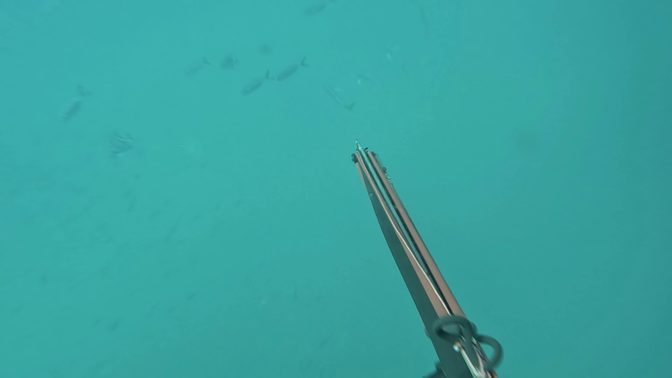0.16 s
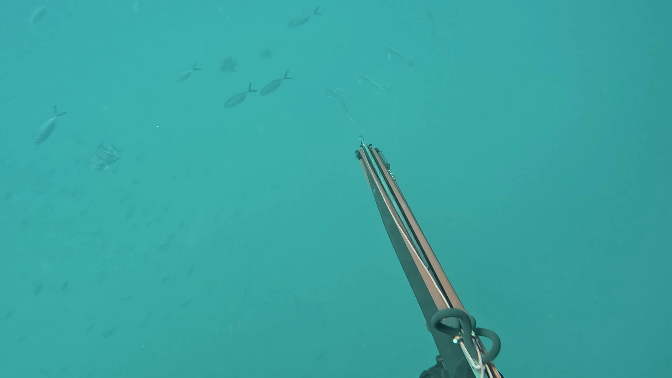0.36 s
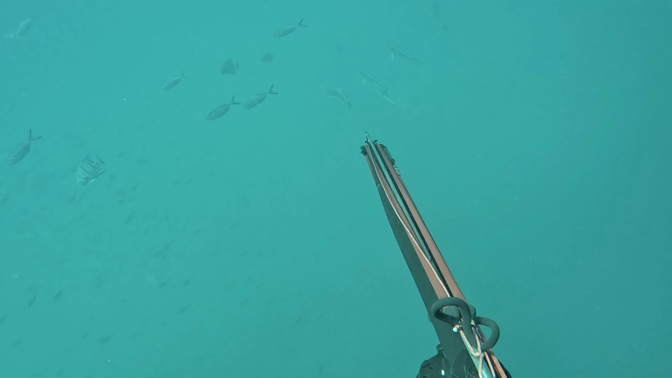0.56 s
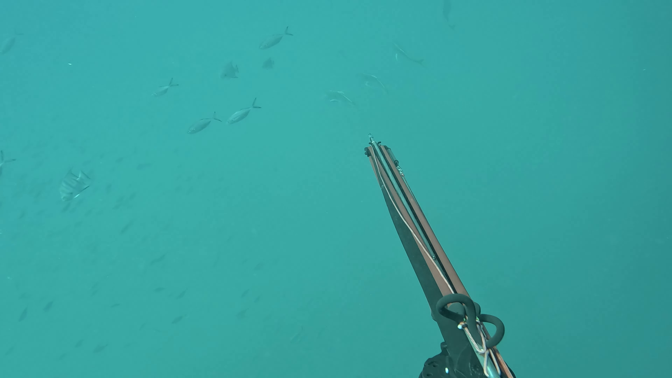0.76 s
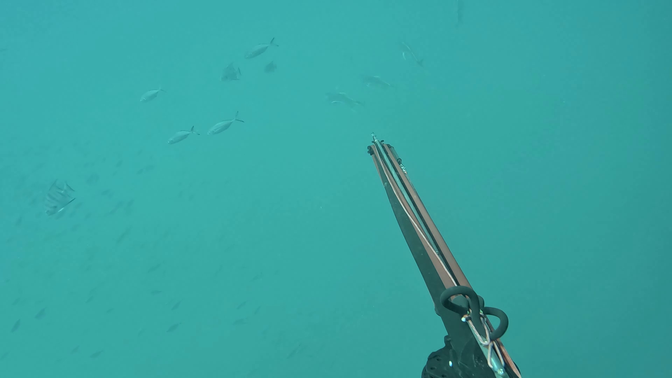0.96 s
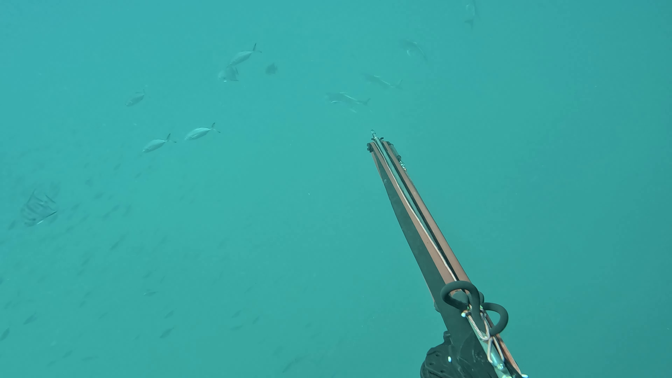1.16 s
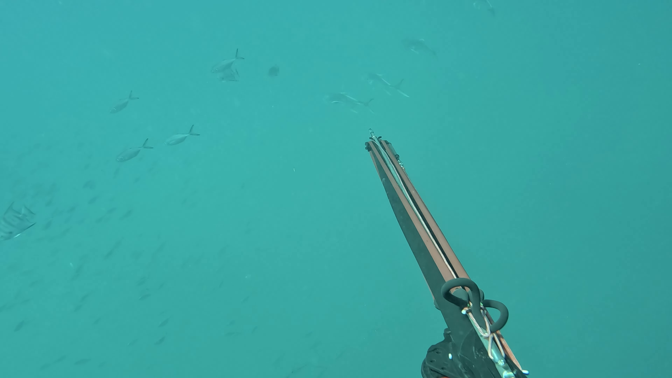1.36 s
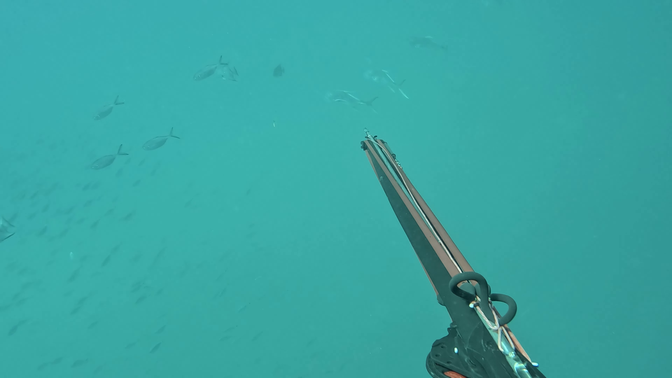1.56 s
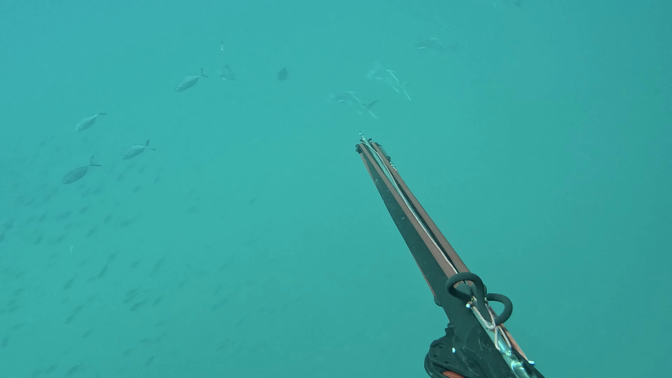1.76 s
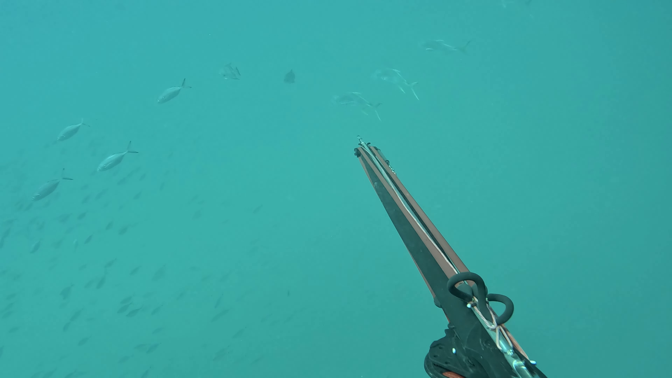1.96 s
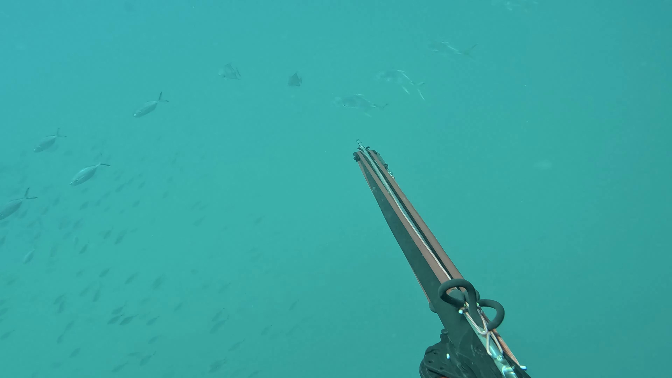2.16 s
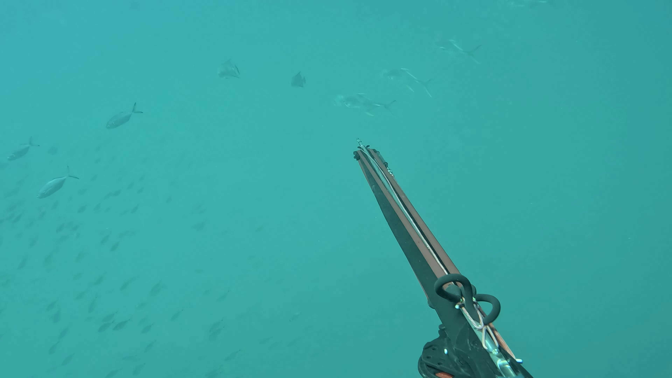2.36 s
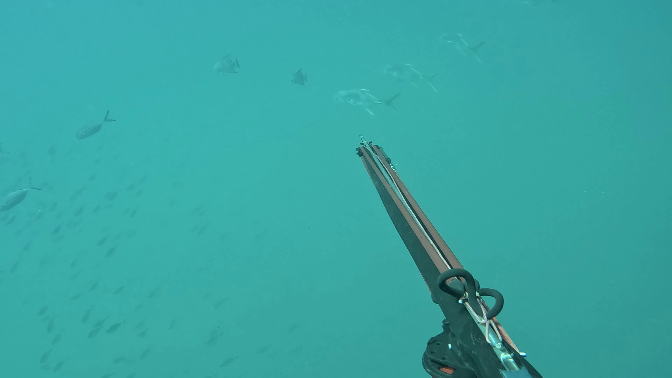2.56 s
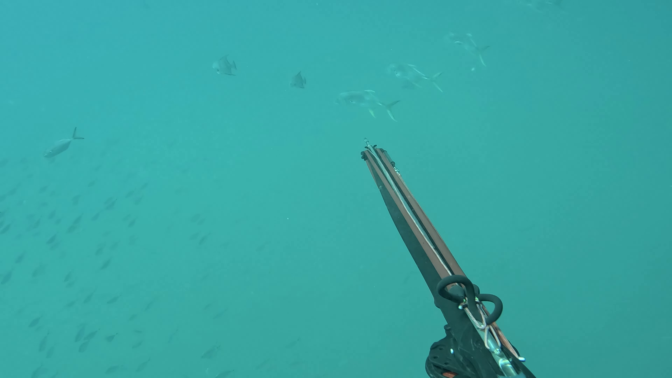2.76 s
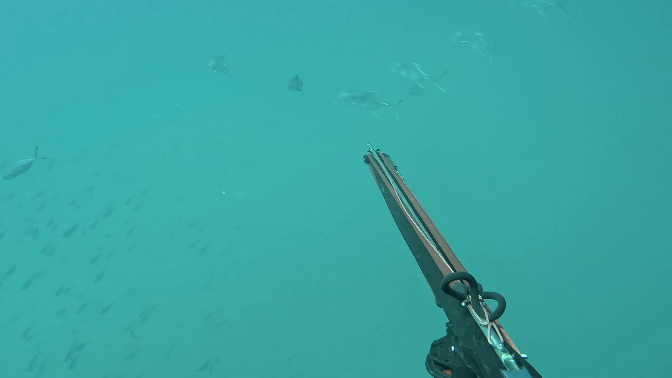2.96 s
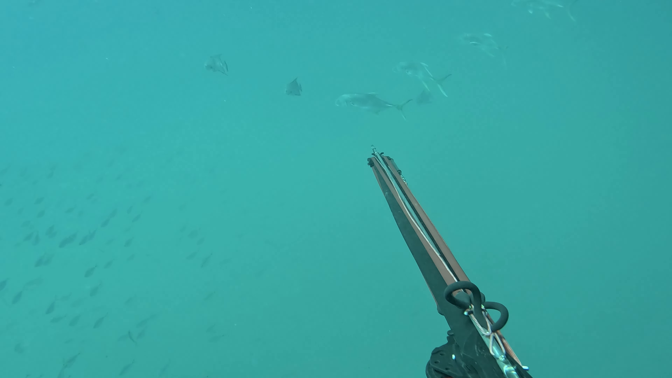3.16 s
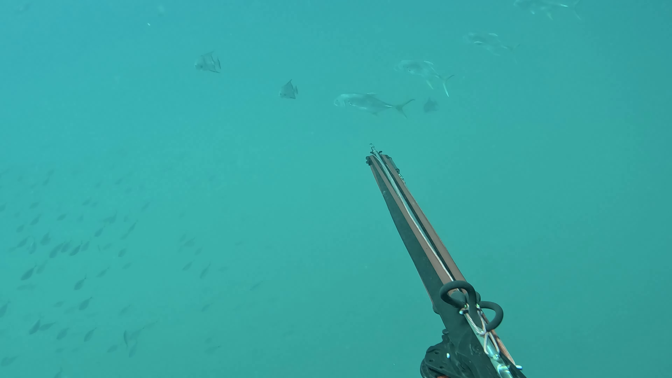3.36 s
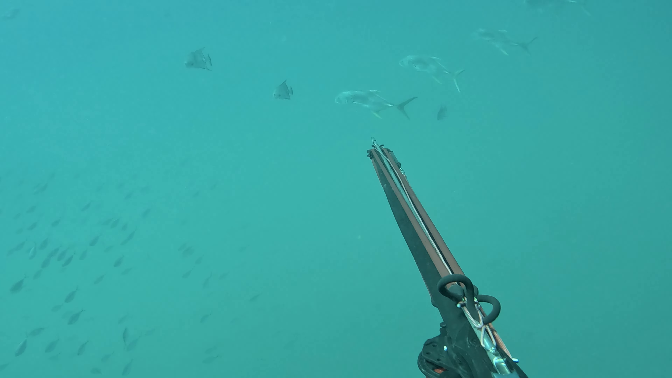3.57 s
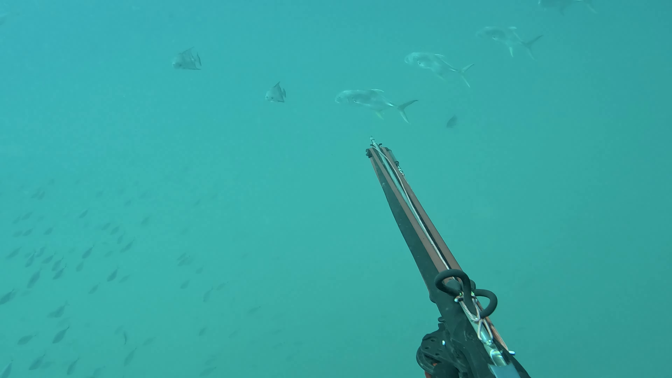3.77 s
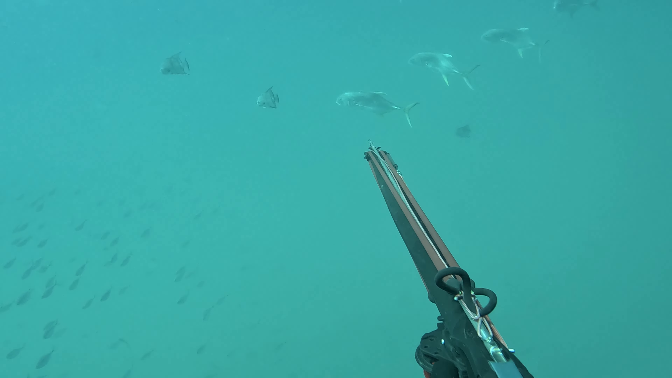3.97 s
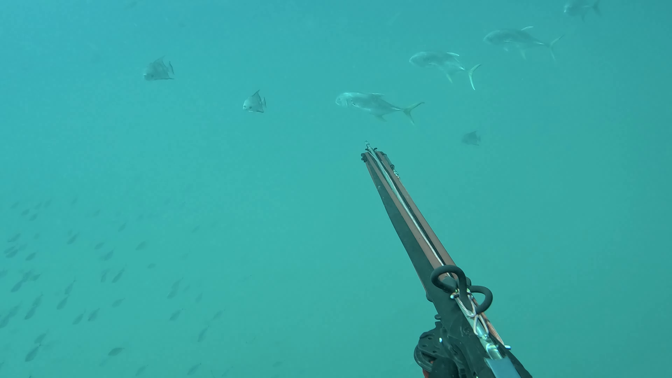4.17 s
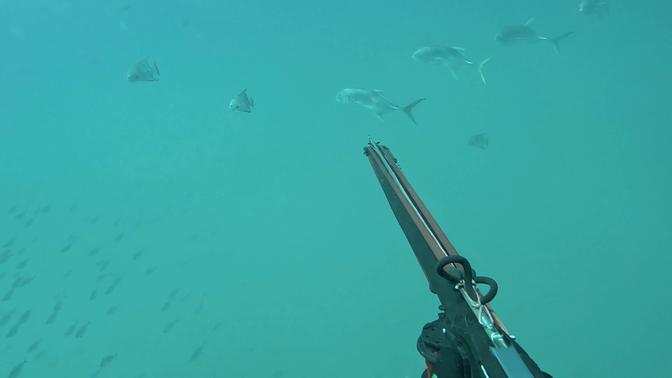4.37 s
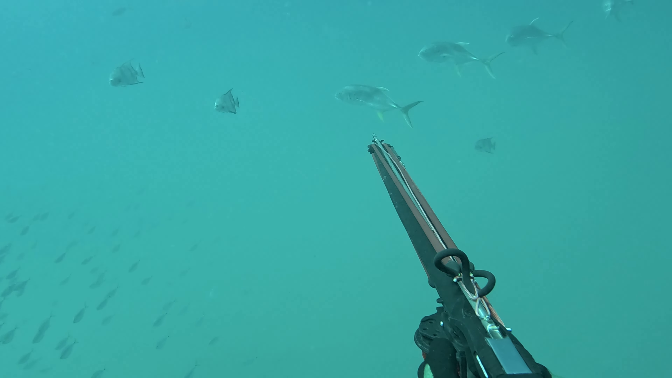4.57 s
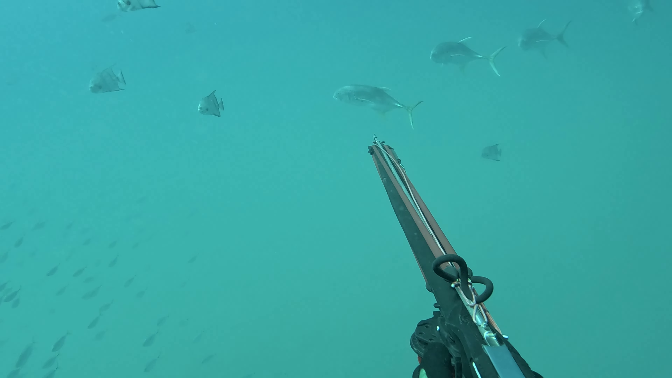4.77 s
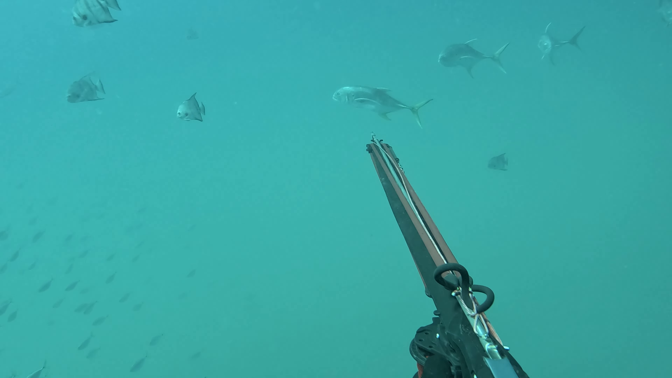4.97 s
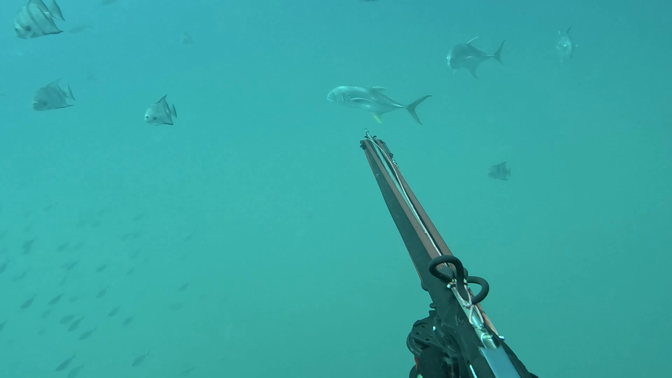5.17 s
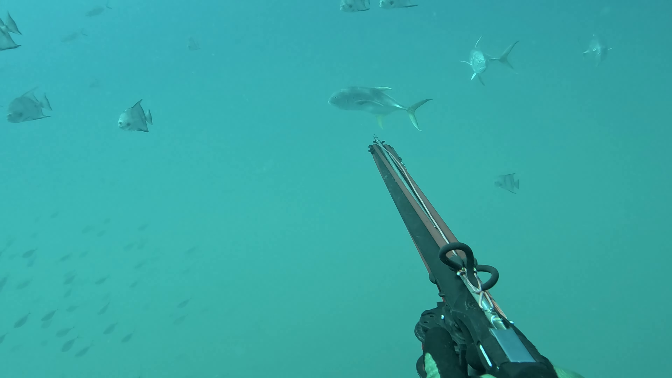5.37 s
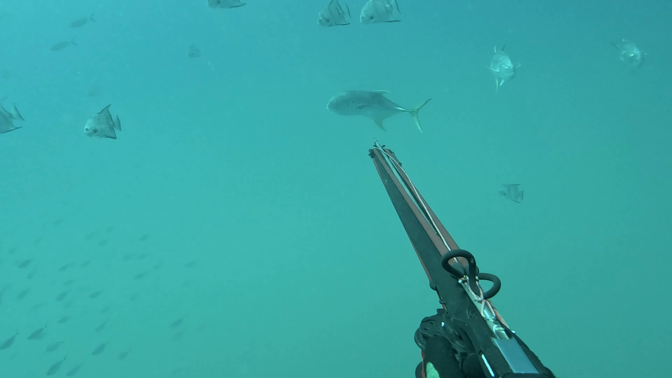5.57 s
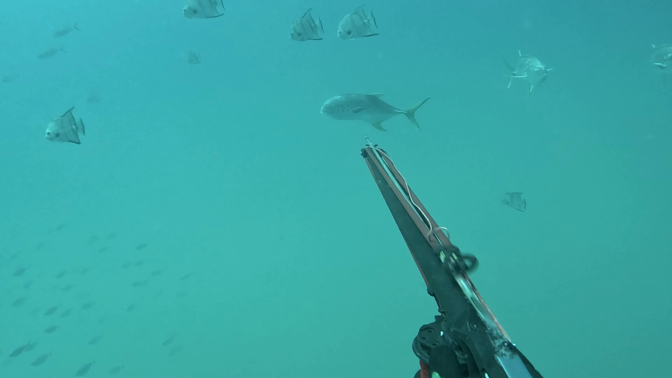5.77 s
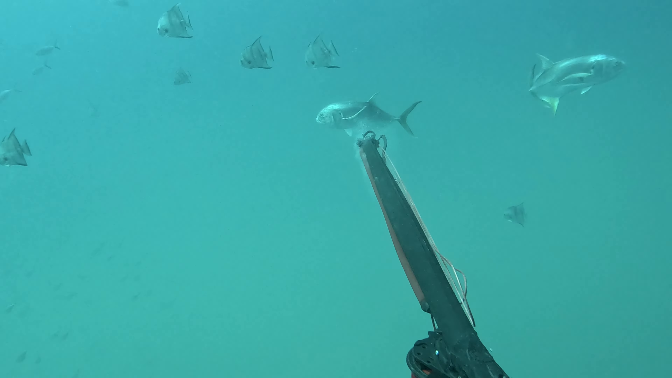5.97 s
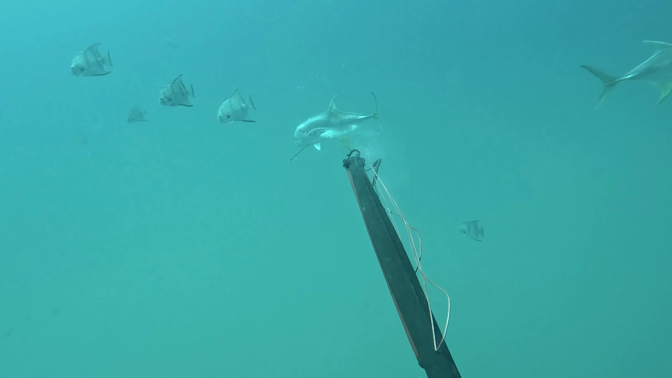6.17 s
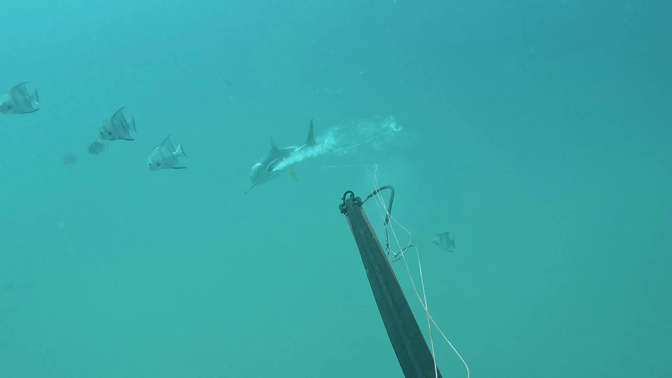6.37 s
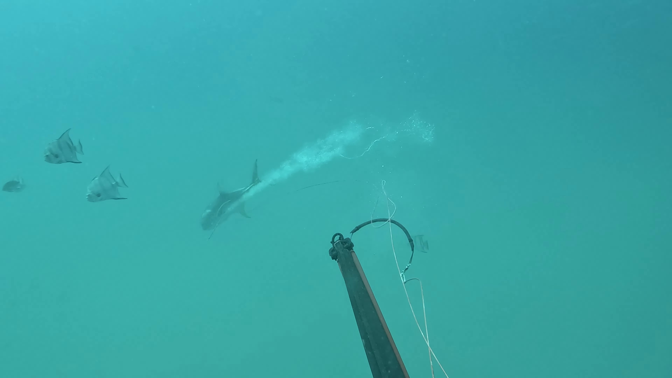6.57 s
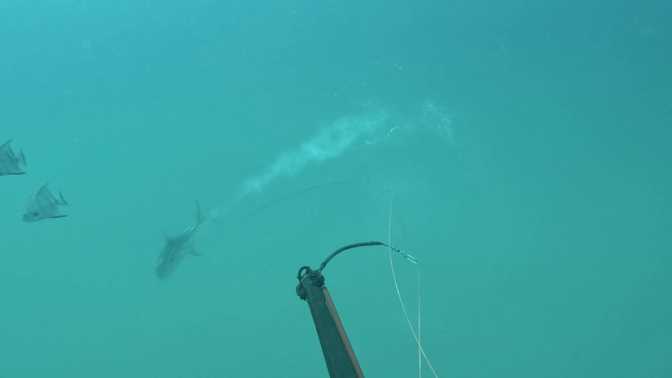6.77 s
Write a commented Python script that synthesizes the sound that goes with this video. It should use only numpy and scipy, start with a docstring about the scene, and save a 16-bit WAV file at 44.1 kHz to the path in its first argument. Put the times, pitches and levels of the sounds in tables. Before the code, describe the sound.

Heard from inside an underwater camera case: low rumble, a faint slow throb and constant snapping shrimp crackle, with small sloshes against the case. Near two seconds one snap lands extremely close, ringing the case and briefly ducking everything. Just before six seconds a dull bump precedes the speargun: trigger clack, rattling metallic scrape, hard double slap and deep thud. Stirred bubbly water then swishes past.

```python
"""Under water by a reef, heard from inside a camera housing: snapping shrimp crackle, made of short noise bursts,
while water rumbles, throbs and sloshes round the case, made of coloured noise, damped swings and bubble blips.
One snap lands very close, rings the case and ducks the recorder's gain. Late on a band speargun fires: the trigger
clacks, the shaft scrapes along its track and the bands slap the muzzle, all of them filtered noise.
Dull bumps go with it, and stirred water swishes after the recoil."""
import sys
import numpy as np
from scipy import signal
from scipy.fft import rfft, irfft, next_fast_len
from scipy.io import wavfile
from scipy.ndimage import uniform_filter1d, minimum_filter1d, map_coordinates

SR = 44100
rng = np.random.default_rng(int(sys.argv[2]) if len(sys.argv) > 2 else 0)


def to_wav(s):
    """Save 16-bit WAV."""
    ch = np.atleast_2d(s).T  # columns
    pcm = np.round(np.clip(ch, -1, 1) * 32767)  # PCM
    wavfile.write(sys.argv[1], SR, pcm.astype(np.int16))


N = 301203
T = np.arange(N) / SR  # time of every sample in seconds
HIT_T = T[:6144]  # time within one short sound

# Tone colour of a snap's woody body. Each row: frequency in Hz, relative level in dB per Hz.
BODY_SPECTRUM = [(500, -27.5), (900, -20.5), (1250, -6.5), (1550, 2), (1850, -2.5), (2100, -13),
                 (2500, -22.5), (4000, -49.5)]
# Tone colour of a snap's middle ring. Each row: frequency in Hz, relative level in dB per Hz.
RING_SPECTRUM = [(1500, -56.5), (2100, -7.5), (2400, -3.5), (2700, 1), (3000, -6), (3250, 0), (3550, -12),
                 (4200, -5.5), (6000, -44)]
# Tone colour of a snap's bright edge. Each row: frequency in Hz, relative level in dB per Hz.
BRIGHT_SPECTRUM = [(2500, -14), (3600, -20), (4250, 3.5), (4900, -3.5), (6000, -5.5), (7100, -8.5),
                   (7750, -2), (8600, -21), (10000, -19), (11000, -39.5), (12000, -24), (13000, -47),
                   (16000, -87)]
# Tone colour of a snap's sharpest edge. Each row: frequency in Hz, relative level in dB per Hz.
CRACK_SPECTRUM = [(2000, -7), (4500, -5), (7800, 0), (9000, -5), (12200, -14.5), (16000, -34)]
# Tone colour of the drone in the case's hollow. Each row: frequency in Hz, relative level in dB per Hz.
HOLLOW_SPECTRUM = [(50, -13.5), (100, -0.5), (125, -2.5), (155, 2.5), (180, -2.5), (215, 1.5), (250, -7),
                   (310, -20), (600, -45.5)]
# Tone colour of murky, muffled water noise. Each row: frequency in Hz, relative level in dB per Hz.
MURK_SPECTRUM = [(200, -16.5), (600, -3.5), (950, 3), (1200, 2), (1500, 2), (1800, -2), (2200, -36),
                 (3200, -20), (3600, -48), (6000, -62)]


def amp(db):
    """Turns decibels into a plain gain."""
    return 10 ** (np.asarray(db) / 20)


def unit(x):
    """Scales a sound to an average strength (rms) of 1."""
    return x / np.sqrt(np.mean(x ** 2) + 1e-20)


def along(points, hz):
    """Reads a (Hz, value) table at any frequency, on a log axis as pitch is heard."""
    point_hz, values = np.transpose(points)
    return np.interp(np.log(hz + 1), np.log(point_hz + 1), values)


def curve(rows):
    """Joins (seconds, value) rows by straight lines, one value per sample."""
    times, values = np.transpose(rows)
    return np.interp(T, times, values)


def wobble(rate):
    """A smooth random curve that takes a new random value this many times a second."""
    knots = rng.standard_normal(int(N * rate / SR) + 4)
    return map_coordinates(knots, [T * rate])


def envelope(start, hold, attack, release):
    """Rises over the attack, stays until the hold is over, then dies away; all in seconds."""
    rise = np.clip((T - start) / attack, 0, 1)
    return rise * np.exp(-np.maximum(T - start - hold, 0) / release)


def filtered(x, response):
    """Changes each frequency of x by the given response."""
    padded = next_fast_len(N + 8192)
    hz = np.fft.rfftfreq(padded, 1 / SR)
    return irfft(rfft(x, padded) * response(hz), padded)[..., :N]


def coloured(x, spectrum, size=8192):
    """Gives x this spectrum with a filter that only looks back in time, falling away above the last point."""
    hz = np.fft.rfftfreq(size, 1 / SR)
    gain = amp(along(spectrum, hz)) / np.maximum(hz / spectrum[-1][0], 1) ** 4
    # folding the log spectrum makes the filter act as early as it can
    cepstrum = irfft(np.log(gain + 1e-6))
    fold = np.r_[1, np.full(size // 2 - 1, 2), np.zeros(size // 2)]
    impulse = irfft(np.exp(rfft(cepstrum * fold)))
    return signal.fftconvolve(x, impulse)[:len(x)]


def noise(spectrum):
    """Steady noise of rms 1 with this tone colour."""
    return unit(coloured(rng.standard_normal(N), spectrum))


def add(track, s, sound):
    """Mixes a sound into the track at time s."""
    part = track[round(s * SR):][:len(sound)]
    part += sound[:len(part)]


def burst(spectrum, t60, attack=0.00037, direct=0):
    """A short crack: a direct pulse and scatter that drops 60 dB in t60 seconds; rms 1 over its first 6 ms."""
    fade = amp(-60 * HIT_T / t60) * (1 - np.exp(-HIT_T / attack))
    push = rng.standard_normal(len(HIT_T)) * fade
    push[round(attack * SR)] += direct * np.linalg.norm(push) * rng.choice([-1, 1])
    crack = coloured(push, spectrum, size=2048)
    return crack / np.sqrt(np.mean(crack[:SR * 6 // 1000] ** 2))


def swell(hz, rise):
    """A heavily damped swing whose envelope peaks after its rise time in seconds."""
    u = HIT_T / rise
    return u ** 2 * np.exp(2 * (1 - u)) * np.sin(2 * np.pi * hz * HIT_T)


def scattered(x, wet_db, t60):
    """Adds the faint diffuse return from sea bed and surface."""
    fade = amp(-60 * HIT_T / t60) * (1 - np.exp(-HIT_T / 0.007))
    tail = rng.standard_normal(len(HIT_T)) * fade
    return x + amp(wet_db) * signal.fftconvolve(x, tail / np.linalg.norm(tail))[:N]


def crackle(spectrum, snaps, spread_db, t60):
    """Crackle of rms 1; each row gives moment, nearness and path spread, 0-1; longer paths smear a snap."""
    power = np.zeros(N)
    for when, nearness, path in snaps:
        life = t60 * amp(16.2 * path)
        shape = amp(-60 * HIT_T / life) * (1 - np.exp(-HIT_T * 25 / life))
        level = amp(spread_db * nearness ** 3 - 22.3 * path)
        add(power, when * (N - 1) / SR, (level * shape) ** 2)
    return unit(coloured(np.sqrt(power) * rng.standard_normal(N), spectrum))


def bubbles(low_hz, high_hz, cycles, count):
    """A dense gurgle of rms 1: short damped blips of scattered pitch and size."""
    out = np.zeros(N)
    for when, pitch, size in rng.random((count, 3)):
        hz = low_hz * (high_hz / low_hz) ** pitch
        add(out, when * (N - 1) / SR, amp(22.0 * size ** 2) * swell(hz, cycles / hz))
    return unit(out)


def shrimp():
    """Each near claw snap rings the case: a woody body, a ring above it and a bright edge with its own pitch."""
    # The nearest snaps. Each row: start in seconds, body level in dB, edge level in dB, edge pitch in Hz.
    near_snaps = [(0.3215, -57, -41, 5400), (0.3694, -34.5, -49, 5300), (0.44, -52, -41, 5300),
                  (0.5038, -37.5, -51, 6100), (0.5346, -55, -42, 5300), (0.554, -61, -40.5, 6400),
                  (0.5797, -38.5, -46, 5500), (0.621, -36, -34, 5170), (0.7647, -49.5, -41.5, 4400),
                  (0.8518, -42, -56, 5400), (0.8936, -57, -41.5, 5270), (0.9595, -69, -42.5, 6050),
                  (1.0913, -41.5, -46, 5300), (1.111, -47, -29.5, 4280), (1.31, -39, -47, 5400),
                  (1.3248, -24, -30.5, 7140), (1.363, -32.5, -62, 7400), (1.5612, -43, -44, 4300),
                  (1.762, -42, -36, 4120), (1.8941, -40, -31, 4170), (1.906, -31, -40, 7500),
                  (2.1863, -34.5, -51, 4000), (2.2446, -36.5, -40.5, 4060), (2.413, -42, -38.5, 4300),
                  (2.4669, -39.5, -46, 3900), (2.5372, -47, -40.5, 4530), (2.6193, -35, -43.5, 4140),
                  (2.641, -40, -45.5, 4300), (2.8759, -35.5, -38, 4300), (3.0174, -42, -41, 7760),
                  (3.0748, -48, -35.5, 4200), (3.208, -32.5, -43.5, 5360), (3.3028, -29.5, -38, 5900),
                  (3.3445, -37.5, -42, 7600), (3.411, -39, -38.5, 7440), (3.4415, -55, -42.5, 6200),
                  (3.5234, -36, -43, 7700), (3.612, -32, -38, 6500), (3.693, -38.5, -45, 6000),
                  (3.7105, -35, -41, 5900), (3.7332, -58, -40.5, 7440), (3.7779, -34.5, -66, 5400),
                  (3.901, -36.5, -42, 7800), (4.11, -38.5, -41, 4500), (4.3238, -27.5, -39.5, 6200),
                  (4.3595, -32.5, -35, 4400), (4.395, -44, -37.5, 4500), (4.4042, -43, -42, 4300),
                  (4.5286, -31.5, -43.5, 6400), (4.811, -30.5, -47, 4600), (4.866, -39.5, -50, 4700),
                  (4.9584, -46, -35.5, 7660), (5.154, -38, -34, 4400), (5.2, -42, -41.5, 4560),
                  (5.2237, -39, -32.5, 4300), (5.3366, -31.5, -42, 5860), (5.4557, -31.5, -40.5, 4530),
                  (5.6371, -35, -39.5, 4300), (5.8154, -33, -41, 7700), (6.052, -33, -36.5, 5200),
                  (6.0757, -34, -34, 6450), (6.7171, -38, -54, 5700), (6.758, -46, -42.5, 4480)]
    ring_offset_db, body_share = -4.5, 0.68  # the ring follows a blend of body and edge levels
    peak_height_db, peak_width_octaves = 11.5, 0.11  # each edge stands out round its own pitch
    out = np.zeros(N)
    hz = np.geomspace(2000, 16000, num=60)
    for s, body_db, edge_db, edge_hz in near_snaps:
        direct = rng.uniform(0.47, 1.18)  # some arrive straight, some smeared by the reef
        body = amp(body_db) * burst(BODY_SPECTRUM, t60=0.019, direct=direct)
        ring_db = body_share * body_db + (1 - body_share) * edge_db + ring_offset_db
        ring = amp(ring_db) * burst(RING_SPECTRUM, t60=0.022, direct=direct)
        peak_db = peak_height_db * np.exp(-(np.log2(hz / edge_hz) / peak_width_octaves) ** 2)
        edge_spectrum = np.c_[hz, along(BRIGHT_SPECTRUM, hz) + peak_db]
        edge = burst(edge_spectrum, t60=0.01, direct=0.76 * direct)
        edge = edge + amp(-19.0 + 4.6 * rng.standard_normal()) * burst(CRACK_SPECTRUM, t60=0.007)
        add(out, s, body + ring + amp(edge_db) * edge)
    return scattered(out, wet_db=-11.5, t60=0.049)


def close_snap():
    """One snap right beside the case makes it ring, far over the recorder's ceiling, and rebounds about 6 ms later."""
    # Ringing of the case. Each row: frequency in Hz, relative level in dB, rise in seconds.
    case_rings = [(204, -25.5, 0.012), (1084, -27, 0.0027), (1533, -6.5, 0.00071), (1713, -3.5, 0.0011),
                  (1850, -25, 0.0031), (2580, -11, 0.0018), (3650, -35, 0.0045), (4660, -20.5, 0.00047)]
    out = np.zeros(N)
    ring = sum(amp(db) * swell(hz, rise) for hz, db, rise in case_rings)
    add(out, 1.9338, amp(8.5) * ring)
    add(out, 1.9342, amp(-31.5) * burst(CRACK_SPECTRUM, t60=0.006))
    rebound = amp(-16.5) * burst(BODY_SPECTRUM, t60=0.016)
    rebound = rebound + amp(-27) * burst(RING_SPECTRUM, t60=0.014)
    rebound = rebound + amp(-41) * burst(BRIGHT_SPECTRUM, t60=0.0113)
    add(out, 1.9395, rebound)
    return out


def reef(count=1100):
    """Countless far snaps merge into a sizzle; nearer ones stick out, some woody, some bright, some both."""
    # Level of the distant shrimp bed, shared by all its layers. Each row: time in seconds, level in dB.
    bed_level = [(0.0, -66.5), (0.3, -60.5), (0.48, -58.5), (1.6, -58.5), (2.0, -59.5), (2.2, -64),
                 (2.6, -60.5), (3.05, -58.5), (3.6, -57), (3.75, -61), (4.4, -57), (4.62, -64),
                 (5.05, -59.5), (5.9, -60), (6.3, -65), (6.83, -65.5)]
    both, woody, thin = rng.random((3, count // 2, 3))
    bright_snaps = np.vstack([both, thin])
    woody_snaps = np.vstack([both, woody])
    bright = amp(3.5) * crackle(BRIGHT_SPECTRUM, bright_snaps, spread_db=27.5, t60=0.009)
    edge = amp(-10.5) * crackle(CRACK_SPECTRUM, thin, spread_db=11, t60=0.0095)
    body = amp(6.5) * crackle(BODY_SPECTRUM, woody_snaps, spread_db=31.5, t60=0.0068)
    ring = amp(-3.0) * crackle(RING_SPECTRUM, woody_snaps, spread_db=20, t60=0.0064)
    far = amp(-3.5 + 3.1 * wobble(23)) * noise(BRIGHT_SPECTRUM) + amp(5.0) * noise(MURK_SPECTRUM)
    return amp(curve(bed_level)) * (bright + edge + body + ring + far)


def speargun():
    """The sear lets go, the shaft chatters along the ringing barrel and the bands strike the muzzle."""
    # Metal contacts. Each row: start in seconds, body level in dB, bright level in dB, 60 dB fade in seconds.
    contacts = [(5.9003, -16, -28.5, 0.017), (5.9114, -20.5, -35, 0.011), (5.942, -25.5, -45, 0.014),
                (5.9805, -9, -44, 0.016), (5.986, -8, -33, 0.011), (6.048, -33, -47, .025),
                (6.061, -38, -44, 0.061), (6.084, -41, -49, 0.017)]
    # Tone colour of a contact's body. Each row: frequency in Hz, relative level in dB per Hz.
    clack_spectrum = [(350, -10), (580, -12.5), (700, 3.5), (900, -3.5), (1400, 10), (1750, 7.5),
                      (2100, -22), (3100, -6.5), (3700, -25.5), (6000, -47)]
    # The shaft sliding out. Each row: time in seconds, level in dB.
    slide_level = [(5.905, -42), (5.934, -36), (5.939, -16.5), (5.955, -23), (5.966, -17), (5.989, -18),
                   (5.995, -30), (6.02, -57), (6.05, -68)]
    # Resonances of the gun. Each row: frequency in Hz, width in Hz, relative level in dB.
    gun_modes = [(730, 120, -27), (1150, 370, -8), (1430, 190, 1.5), (1665, 170, 1.5), (2640, 230, -8.5),
                 (3070, 155, 1), (4570, 270, -11), (4840, 330, -12.5), (6440, 280, -22.5), (7400, 300, -22)]
    out = np.zeros(N)
    for s, body_db, bright_db, t60 in contacts:
        body = amp(body_db) * burst(clack_spectrum, t60, attack=0.00066)
        add(out, s, body + amp(bright_db) * burst(BRIGHT_SPECTRUM, t60, attack=0.001))

    def barrel(f):
        """Sums the gun's resonances, with every second one upside down."""
        total = 0
        for k, (hz, width, db) in enumerate(gun_modes):
            total = total + (-1) ** k * amp(db) * 1j * f * width / (hz * hz - f * f + 1j * f * width)
        return total

    chatter = rng.standard_normal(N) * amp(2.8 * wobble(500))
    scrape = unit(filtered(chatter, barrel)) + amp(-23.0) * noise(BRIGHT_SPECTRUM)
    scrape = filtered(scrape, lambda f: 1 / (1 + (f / 8500) ** 12))  # the case wall keeps out the top
    sliding = (T > slide_level[0][0]) & (T < slide_level[-1][0])
    out = out + sliding * amp(curve(slide_level)) * scrape
    return scattered(out, wet_db=-25.5, t60=0.086)


def handling():
    """Dull bumps of grip and recoil are damped swings; one tink of a metal fitting is a few fading tones."""
    # Soft bumps on gun and case. Each row: start in seconds, level in dB, frequency in Hz, rise in seconds.
    bumps = [(0.438, -16.5, 134, 0.005), (0.464, -14, 80, 0.0064), (2.663, -17.5, 76, 0.0065),
             (5.546, -24, 220, 0.0032), (5.567, -19.5, 389, 0.004), (5.569, -6.5, 178, 0.0031),
             (5.571, -28.5, 546, 0.0026), (5.578, -17, 260, 0.004), (5.901, -10, 65.5, 0.0054),
             (5.904, -14, 205, 0.0071), (5.961, -9.5, 35.6, 0.014), (5.981, -12.5, 1010, .0017),
             (5.986, -22.5, 430, 0.0021), (5.992, -2.5, 168, 0.004), (5.996, -11, 26.7, 0.027),
             (6.067, -19, 44.6, .015), (6.071, -11.5, 153, 0.013), (6.195, -29.5, 164, 0.017),
             (6.606, -26.5, 95, 0.011), (6.655, -17, 332, 0.00029), (6.678, -25, 164.6, .016),
             (6.744, -17.5, 300, .0005)]
    # A small metal fitting. Each row: frequency in Hz, relative level in dB, 60 dB fade in seconds.
    fitting_tones = [(2620, -25.5, 0.031), (5450, -19.5, 0.013), (5620, -28.5, 0.012)]
    out = np.zeros(N)
    for s, db, hz, rise in bumps:
        add(out, s, amp(db) * swell(hz, rise))
    tink = sum(amp(db - 60 * HIT_T / t60) * np.sin(2 * np.pi * hz * HIT_T) for hz, db, t60 in fitting_tones)
    add(out, 2.0737, amp(2.5) * tink * (1 - np.exp(-HIT_T / 0.00056)))
    return out


def water():
    """Water sloshes and gurgles round the case; after the shot a wake of finer bubbles swirls past."""
    # Sloshes round the case. Each row: start in seconds, length in seconds, relative level in dB.
    sloshes = [(0.186, 0.077, -41.5), (0.305, 0.039, -41.5), (0.428, .06, -43), (0.548, 0.15, -43.5),
               (0.72, 0.3, -50.5), (1.05, 0.07, -42), (1.276, .24, -46.5), (1.616, .12, -42.5),
               (1.906, 0.042, -39), (2.25, 0.25, -56), (2.758, 0.059, -45), (2.9, 0.082, -46),
               (3.207, 0.29, -50), (3.563, 0.21, -42.5), (3.858, 0.076, -46), (3.993, 0.15, -43.5),
               (4.268, .07, -47.5), (4.4, .11, -48), (4.767, 0.17, -51.5), (5.547, 0.019, -39),
               (6.2, 0.13, -43), (6.352, 0.47, -43.5)]
    # Tone colour of a slosh. Each row: frequency in Hz, relative level in dB per Hz.
    slosh_spectrum = [(150, -19.5), (300, 5), (400, 1.5), (600, -4), (800, -13.5), (1400, -8), (1900, -27),
                      (2400, -46.5), (6000, -58)]
    laps = [amp(db) * envelope(s, length, attack=0.022, release=0.035) for s, length, db in sloshes]
    laps = np.hypot(np.max(laps, axis=0), amp(-57.5))  # a faint lapping goes on between sloshes
    laps = laps * amp(-3.0 + 2.2 * wobble(28))
    gurgle = amp(-2.5) * bubbles(297, 602, cycles=1.7, count=600)
    slosh = laps * (noise(slosh_spectrum) + gurgle)

    swirl = envelope(6.16, hold=0.25, attack=0.048, release=1)
    stirred = swirl * amp(-49 + 3.4 * wobble(40))
    # fine fizz of the wake: in the case's upper ring, and above it
    fizz = amp(-9.5) * noise(RING_SPECTRUM) + amp(-15) * noise(BRIGHT_SPECTRUM)
    fine_bubbles = amp(1.5) * bubbles(924, 1830, cycles=2.2, count=1100)
    wake = stirred * (noise(MURK_SPECTRUM) + fine_bubbles + fizz)
    wake_drone = amp(-38.5) * swirl * noise(HOLLOW_SPECTRUM)
    return slosh + wake + wake_drone


def rumble():
    """Flow buffets the case and drones in its hollow, harder when the recoil shakes it, then the buffeting calms."""
    # Tone colour of the flow. Each row: frequency in Hz, relative level in dB per Hz.
    flow_spectrum = [(8, -20.5), (18, 2), (34, 2), (55, -6), (85, -10.5), (130, -21), (300, -53.5)]
    # The drone in the case's hollow. Each row: time in seconds, relative level in dB.
    drone_level = [(0.0, -46), (0.3, -44), (0.62, -40), (1.3, -41), (2.2, -42.5), (2.6, -40.5),
                   (3.1, -42.5), (4.3, -37.5), (5.1, -39), (5.7, -41), (6.83, -37.5)]
    recoil_s, recoil_hold_s = 5.9, 0.22
    recoil = envelope(recoil_s, recoil_hold_s, attack=0.066, release=0.065)
    calm = np.clip((T - recoil_s) / recoil_hold_s, 0, 1)
    buffet = amp(-33 - 6.5 * calm + 1.4 * wobble(9)) + amp(-25.5) * recoil
    drone = amp(curve(drone_level) - 1.0 + 3.1 * wobble(17)) + amp(-33.5) * recoil
    return buffet * noise(flow_spectrum) + drone * noise(HOLLOW_SPECTRUM)


def throb(count=13):
    """Evenly spaced low pushes on the mount, perhaps the diver's pulse, that slowly weaken."""
    first_s, period_s, fade_db_per_s = 0.245, 0.44, -1.0
    out = np.zeros(N)
    for s in first_s + period_s * np.arange(count):
        add(out, s, amp(-19 + fade_db_per_s * s) * swell(hz=33, rise=0.02))
    return out


def scene():
    """Both microphone ports share the air in the case, each with its own colour, plus a little noise set apart."""
    # Loudness of the two ports. Each row: frequency in Hz, left minus right in dB.
    port_levels = [(60, -3), (99, -2.5), (160, -2.5), (270, -5.5), (450, -4.5), (740, -6.5), (1220, -7),
                   (2010, 2), (3330, 0.5), (5500, -4), (9080, 1.5), (15000, -1)]
    # Timing of the two ports. Each row: frequency in Hz, phase by which the left leads in radians.
    port_leads = [(0, -1.1), (600, 0.83), (1890, 0.37), (2410, -1.12), (3190, -0.37), (3450, -1.76),
                  (4050, 0.47), (7060, 0.047), (11700, 0.6), (16100, 0.42)]
    case = shrimp() + close_snap() + reef() + speargun() + handling() + water() + rumble() + throb()

    def ports(hz):
        """Gives each port half of the level and phase difference."""
        halves = [0.5, -0.5]
        gain = amp(np.outer(halves, along(port_levels, hz)))
        return gain * np.exp(1j * np.outer(halves, along(port_leads, hz)))

    pair = filtered(case, ports)
    # faint noise that swings opposite ways in the two ports
    apart = amp(-79.5) * noise(BRIGHT_SPECTRUM) + amp(-69.5) * noise(MURK_SPECTRUM)
    apart = apart + amp(-63.5) * noise(HOLLOW_SPECTRUM)
    return pair + np.array([apart, -apart])


def record(dry, release_db_per_s=32, top_hz=15900):
    """A limiter catches peaks over full scale at once and recovers slowly; then the top is cut off."""
    over_db = np.maximum(20 * np.log10(np.abs(dry).max(axis=0) + 1e-9), 0)
    # hold the largest overload so far, letting it shrink at the release rate
    held_db = np.maximum.accumulate(over_db + release_db_per_s * T) - release_db_per_s * T
    gain = uniform_filter1d(minimum_filter1d(amp(-held_db), size=64), size=64)
    return filtered(dry * gain, lambda hz: hz < top_hz)


dry = scene()
out = record(dry)
to_wav(out)
```